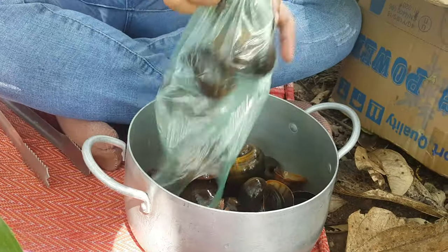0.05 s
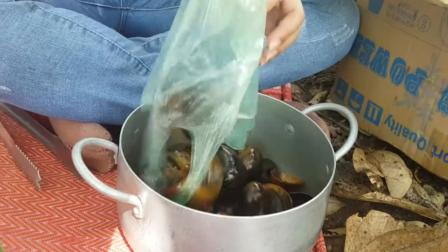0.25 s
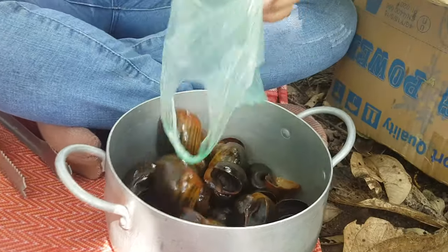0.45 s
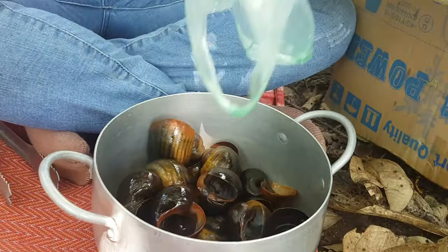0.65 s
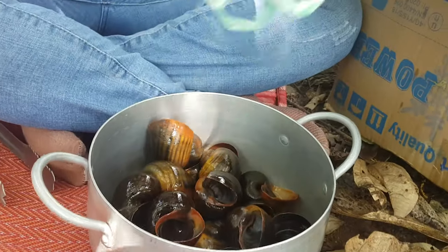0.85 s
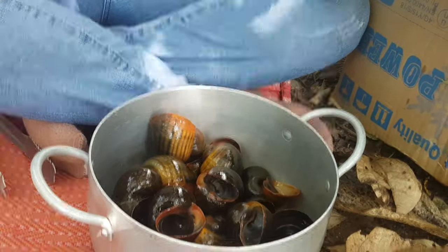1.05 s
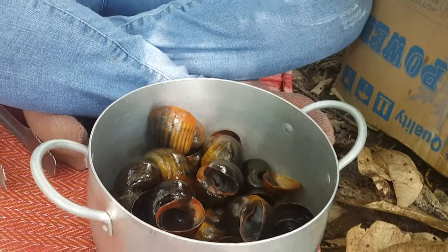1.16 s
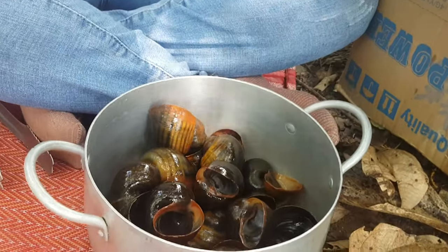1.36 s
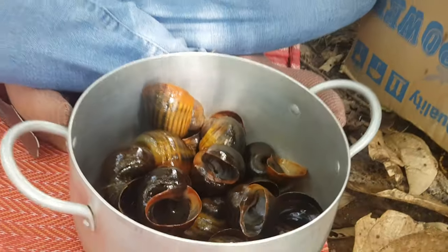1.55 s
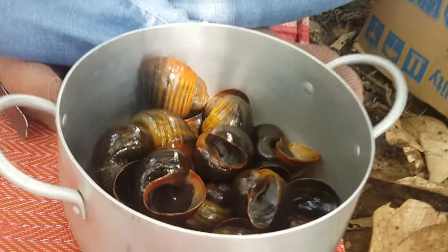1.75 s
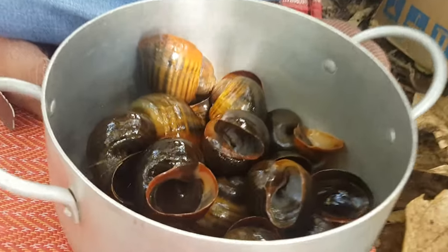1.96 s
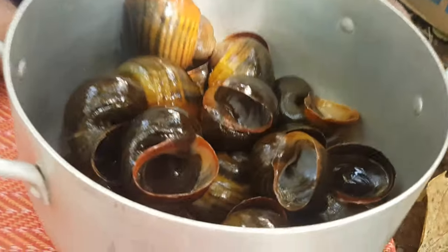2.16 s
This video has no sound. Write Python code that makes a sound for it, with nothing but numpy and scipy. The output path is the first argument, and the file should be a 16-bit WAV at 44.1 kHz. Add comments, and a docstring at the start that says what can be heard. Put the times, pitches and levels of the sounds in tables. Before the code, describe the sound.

Large hard snail shells spill from a rustling thin plastic bag into a metal pot, clattering densely for under half a second, then a few last knocks and dull taps on a mat; outdoors, close microphone.

```python
"""Snail shells into a metal pot

Large snail shells slide out of a thin plastic bag into a metal pot outdoors, heard close by.
Each knock chatters briefly: damped sines ring shell and pot over decaying noise for clack and crack.
Small chance clicks excite the pot modes as the pile shifts; random short-time spectra make the bag
rustle throughout. Later a few dull taps, short damped sines, land on the mat over a faint far rumble."""
import sys
import numpy as np
from scipy import signal
from scipy.fft import rfft, irfft
from scipy.io import wavfile
from scipy.ndimage import uniform_filter1d

SR = 44100
rng = np.random.default_rng(int(sys.argv[2]) if len(sys.argv) > 2 else 0)


def persist_wave(psi):
    """Save psi, clipped to +-1, as 16-bit WAV."""
    counts = np.round(np.clip(psi, -1, 1) * 32767).astype(np.int16)
    wavfile.write(sys.argv[1], SR, np.atleast_2d(counts).T)


N = 97020

# Far rumble: spectrum (frequency [Hz], level [dB]); course (time [s], level [dB])
RUMBLE_SPECTRUM = [(20, -26), (27, -22), (32, -37), (59, 1.5), (107, 5), (198, -14.5), (331, -7),
                   (400, -17), (520, -43), (880, -120)]
RUMBLE_COURSE = [(0.0, -59.5), (0.45, -56), (0.62, -66), (1.06, -64), (1.6, -52), (2.2, -57.5)]
# Bag: course before BAG_DB (time [s], level [dB]); film spectrum (frequency [Hz], level [dB])
BAG_COURSE = [(0, -52.5), (.03, -51.5), (.12, -40), (.2, -40.5), (.31, -34), (.42, -39.5), (.61, -52),
              (.8, -60), (.93, -58), (1.07, -50), (1.12, -55.5), (1.19, -50.5), (1.28, -55), (1.39, -47),
              (1.45, -49), (1.56, -47.5), (1.66, -49.5), (1.71, -53.5), (1.83, -49.5), (1.95, -56),
              (2.1, -51), (2.2, -54)]
BAG_SPECTRUM = [(88, -46), (150, -19), (175, -6.5), (566, -3.5), (649, -1), (1020, 0), (1170, -1),
                (1760, 1.5), (3100, 1.5), (4860, -1), (7470, 4.5), (9440, -2.5), (12900, 2.5), (15100, 2),
                (16000, -8.5)]
# Bag in stereo: (frequency [Hz], left-right likeness [0-1]); (frequency [Hz], left minus right [dB])
BAG_LIKENESS = [(60, 0.95), (180, 0.98), (550, 1), (1650, 1), (4970, 0), (15000, 0.0017)]
BAG_BALANCE = [(60, 4), (180, 3), (550, -1), (1650, -1), (4970, -5.0), (15000, -2.0)]
# Taps on the mat: (time before fixed delay [s], level [dB], pitch [Hz], thump [dB], T60 [s])
MAT_TAPS = [(0.954, -44, 627, -15, 0.02), (1.388, -48.5, 1230, -2, 0.018), (1.557, -14, 430, -29, 0.0059),
            (1.567, -23.5, 400, -10, 0.0051), (1.617, -9.5, 880, -14.5, 0.0062),
            (1.623, -18, 670, -13.5, 0.016), (1.63, -25.5, 338, -18.5, 0.035),
            (1.659, -27, 1380, -12, 0.009), (1.666, -28, 800, -18, 0.0071),
            (1.694, -24.5, 500, -13, 0.0065), (1.833, -38.5, 510, -6, 0.019), (2.117, -42, 720, -12, 0.016),
            (2.137, -33, 686, -10, 0.011)]
# Modes of the loaded pot and pile, before scatter: (frequency [Hz], level [dB], T60 [s])
POT_MODES = [(606, 1.5, 0.047), (870, 6, 0.012), (1038, -1, 0.068), (1402, 0, 0.021), (1640, 1, 0.0044),
             (2070, -10, 0.031), (2287, -10.5, 0.048), (4060, -21.5, 0.073), (4562, -17.5, 0.09),
             (5190, -15.5, 0.054), (6176, -18, 0.05)]
# Shells shifting in the pile, before PILE_DB: (time [s], level [dB])
PILE_COURSE = [(0.19, -37), (0.264, -64), (0.38, -24.5), (0.438, -22), (0.564, -28.5), (0.66, -39.5),
               (0.858, -38.5), (0.92, -85)]
# Shell knocks: (time before fixed delay [s], level [dB], hollow [Hz], wall [Hz],
#   hollow level before cap [dB], crack level [dB], chatter decay [s], crack centre [Hz])
SHELL_KNOCKS = [(0.075, -36, 1137, 3200, 10, 5.5, 0.0055, 3230),
                (0.097, -37, 1120, 3180, 6, -23, 0.0039, 6200),
                (0.209, -6, 535, 1640, 1, -8.5, 0.002, 8500),
                (0.214, -7.5, 780, 1580, -2, -11.5, 0.0091, 3550),
                (0.231, -10.5, 570, 1210, 6, -32, 0.0022, 3470),
                (0.235, -3.5, 555, 2130, -10, -5, 0.0021, 3660),
                (0.245, -6.5, 627, 1500, -22, -8.5, 0.0037, 3670),
                (0.263, -17, 520, 1020, -3, -15, 0.0023, 3970),
                (0.274, -10, 536, 2290, 7, -34.5, 0.0029, 3860),
                (0.299, -8.5, 1150, 3240, -14, -9, 0.0006, 3350),
                (0.314, -10.5, 640, 1300, -19, -10, 0.0013, 5800),
                (0.318, -1.5, 644, 2020, -3, -9.5, 0.0055, 3470),
                (0.336, -2, 1370, 1780, -18, -11, 0.0036, 8200),
                (0.346, -1.5, 680, 1210, -10.5, -15, 0.0023, 6660),
                (0.357, -7, 1136, 1960, -7, -12.5, 0.0071, 7550),
                (0.362, -7.5, 1060, 1500, -7, -14, 0.001, 3900),
                (0.3661, -13, 980, 3430, -21, 1.5, 0.0016, 3600),
                (0.375, -7.5, 580, 2000, 3, -12.5, 0.0039, 3520),
                (0.387, -12, 1000, 1830, -1.5, -15.5, 0.0064, 4740),
                (0.405, -10.5, 401, 3080, -27, 1, 0.0023, 12800),
                (0.406, -5.5, 600, 2340, -14, -8, 0.0015, 12300),
                (0.418, -3.5, 1040, 1870, -28, -14, 0.0042, 3950),
                (0.423, -6, 640, 2020, -26, -12.5, 0.0025, 4120),
                (0.4273, -5.5, 644, 1530, -2, -9.5, 0.0081, 3650),
                (0.438, -9.5, 1090, 1700, -15, -11, 0.01, 8200),
                (0.455, -7, 1020, 2220, -15, -13, 0.0058, 4400),
                (0.472, -8, 600, 2000, 1, -25, 0.0012, 3870),
                (0.482, -19.5, 1034, 1360, 10.5, -14, 0.014, 3740),
                (0.49, -9, 644, 1770, -10.5, -23, 0.0025, 6760),
                (0.503, -18, 554, 1700, 19, 1.5, 0.006, 8040),
                (0.512, -15, 990, 1340, 20.5, -7, 0.0085, 7150),
                (0.547, -12, 950, 2380, -5, -2.5, 0.0075, 4610),
                (0.566, -2, 806, 2000, -2, -21, 0.0032, 5440),
                (0.571, -9, 627, 2420, -3, -7.5, 0.0027, 5070),
                (0.578, -9, 816, 1460, -3, -12, 0.0011, 4600),
                (0.589, -18, 955, 1490, 2.5, -10, 0.0068, 4580),
                (0.609, -24, 614, 1940, -2, -7.5, 0.0053, 7550),
                (0.675, -28.5, 1000, 2030, 2, -12, 0.0028, 4600),
                (0.7114, -3.5, 620, 1800, -8, -19.5, 0.0018, 3500),
                (0.7326, -10.5, 600, 1060, -6, -12.5, 0.00056, 3500),
                (0.768, -28.5, 610, 2210, 4, -40, 0.0027, 4130),
                (0.778, -29.5, 1040, 1680, 13, -46, 0.0066, 3810),
                (0.797, -12, 1100, 1630, -10, -15, 0.002, 6600),
                (0.804, -16.5, 550, 1820, 2, -12, 0.0017, 3740),
                (0.813, -23.5, 1036, 2010, 4.5, -17, 0.007, 7850),
                (0.825, -27, 634, 1310, 12, -27, 0.0014, 4760),
                (0.841, -25.5, 1077, 575, 11, 0.5, 0.0023, 7850),
                (0.88, -31, 1080, 600, 9, -24, 0.0056, 7420),
                (0.99, -42.5, 1030, 1330, 3.5, -25, 0.0037, 7530)]
# Thump of the pot floor under each knock: (time [s], level [dB])
FLOOR_COURSE = [(.21, -2), (.216, -20), (.235, -11.5), (.26, -16.5), (.45, -21.5), (.57, -11.5), (.62, -21)]
# Bright crack and broad body of a blow: (frequency [Hz], level [dB])
CRACK_SPECTRUM = [(1470, -30), (2500, -1), (4170, -8.5), (5650, -5.5), (6200, -8.5), (6700, -2),
                  (10100, -11.5), (12400, -11.5), (15200, -15.5), (16000, -27)]
CLACK_SPECTRUM = [(88, -51), (150, -27), (596, 5.5), (749, -1), (1010, -2), (1230, -10), (1970, 1),
                  (2700, -6.5), (4500, -20.5), (9900, -120)]
# Stereo of the shells: (frequency [Hz], left minus right [dB])
SHELL_BALANCE = [(60, 6), (150, -0.5), (380, 3), (950, -1), (2380, -2), (5980, -7), (15000, 0.5)]
# Chance phase between the microphones: (frequency [Hz], phase scale [rad])
MIC_PHASE = [(800, 0.082), (1000, 0.16), (3000, 1)]

BAG_DB, CRINKLES_PER_S, CRINKLE_DB = 4.5, 1500, -3.5
THUMP_HZ, THUMP_T60_S = 205, 0.028
TAP_DELAY_S, TAP_RISE_S = 0.003, 0.0003
TAP_TICK_HZ, TAP_TICK_T60_S, TAP_TICK_DB = 1370, 0.003, -4
TAP_NOISE_DECAY_S, TAP_NOISE_DB = 0.0062, -18
POT_DB, POT_SCATTER_DB, POT_DETUNE = -18.5, 7, 0.0448  # detune as a fraction of frequency
STEADY_HZ = 1200  # modes up to here do not scatter
PILE_DB, SHIFTS_PER_S, SHIFT_SPREAD_DB, PILE_STRIKES = -4.5, 1400, 1, 12
KNOCK_DELAY_S, BLOW_RISE_S = 0.001, 0.0005  # start this much after the listed time, then rise
CHATTER_PER_S, CHATTER_DB = 1700, -7.5
REBOUND_MAX = 0.7  # no rebound outdoes the first blow
HOLLOW_T60_S, HOLLOW_REF_HZ = 0.021, 1000  # T60 at the reference pitch; lower hollows die sooner
HOLLOW_RISE_S = 0.0011
HOLLOW_MAX_DB = -5  # cap on knock level plus hollow level
WALL_DB, WALL_CYCLES = -1, 14.6  # cycles to fall 60 dB
TICK_HZ, TICK_T60_S, TICK_DB = 2970, 0.003, -6.5
CLACK_DB, CLACK_DECAY_S = -11, 0.0035
CRACK_DECAY_S, CRACK_OCTAVES, CRACK_BUMP_DB = 0.0018, 0.29, 10.5
BASS_CUT_HZ = 504
FLOOR_HZ, FLOOR_T60_S = 281, 0.015
ECHO_T60_S, ECHO_CUT_HZ, SHELL_ECHO_DB, TAP_ECHO_DB = 0.031, 1026, -3, -1
EDGE_HZ = 15800


def amp(db):
    """Decibels to amplitude ratio."""
    return 10 ** (np.asarray(db) / 20)


def evened(x):
    """Scale to unit RMS."""
    return x / np.sqrt(np.mean(x ** 2) + 1e-20)


def read(points, hz):
    """Interpolate a table over log frequency."""
    f, value = np.transpose(points)
    return np.interp(np.log(hz + 1), np.log(f + 1), value)


def level(course):
    """Amplitude over time, linear in dB; -120 dB before the first point."""
    s, db = np.transpose(course)
    return amp(np.interp(np.arange(N) / SR, s, db, left=-120, right=db[-1]))


def high_pass(x, hz, order=2):
    """Butterworth bass cut."""
    return signal.lfilter(*signal.butter(order, hz, "high", fs=SR), x)


def rise(t, rise_s):
    """Exponential approach to full level."""
    return 1 - np.exp(-t / rise_s)


def add(mix, s, sound):
    """Mix a sound in at a time, cut at the end."""
    part = mix[:, round(s * SR):][:, :sound.shape[1]]
    part += sound[:, :part.shape[1]]


def ring(hz, t60_s, t, phase=0):
    """Damped mode: a sine falling 60 dB in t60_s."""
    return amp(-60 * t / t60_s) * np.sin(2 * np.pi * hz * t + phase)


def pair(hz, t60_s, t, chance):
    """A ring heard at both microphones, out of step by chance."""
    phase = read(MIC_PHASE, hz) * chance
    return np.array([ring(hz, t60_s, t, phase), ring(hz, t60_s, t, -phase)])


def colour(x, points):
    """Filter by a spectrum table, leaving phase alone."""
    hz = np.fft.rfftfreq(x.shape[-1], 1 / SR)
    return irfft(rfft(x) * amp(read(points, hz)), x.shape[-1])


def lean(stereo, points):
    """Split a left-right level difference evenly over the channels."""
    left = colour(stereo[0], [(f, db / 2) for f, db in points])
    right = colour(stereo[1], [(f, -db / 2) for f, db in points])
    return np.array([left, right])


def hiss(points, size, patchy_db, flicker_db, same):
    """Random short-time spectra with drifting patches and a flicker shared by all bands."""
    hop = size // 4
    frames, hz = N // hop + 5, np.fft.rfftfreq(size, 1 / SR)
    a, b, c, d, patches = rng.standard_normal((frames, len(hz), 5)).T
    patches = uniform_filter1d(patches, size=12, axis=0)  # over frequency
    patches = evened(uniform_filter1d(patches, size=35, axis=1))  # over time
    flicker = evened(uniform_filter1d(rng.standard_normal(frames), size=5))
    like = np.clip(read(same, hz), -1, 1)[:, None]
    left = a + 1j * b
    right = like * left + np.sqrt(1 - like ** 2) * (c + 1j * d)
    gain_db = read(points, hz)[:, None] + patchy_db * patches + flicker_db * flicker
    spectra = np.array([left, right]) * amp(gain_db)
    return evened(signal.istft(spectra, nperseg=size, noverlap=size - hop)[1][:, :N])


def echoes(x):
    """Dense decaying reflections, drawn separately for each microphone."""
    count, spacing = 200, 20  # one reflection per 20 samples
    taps = np.zeros((2, count * spacing))
    at = np.arange(count) * spacing + rng.integers(0, spacing, (2, count))
    strength = rng.choice([-1., 1.], at.shape) * amp(-60 * at / SR / ECHO_T60_S)
    np.put_along_axis(taps, at, strength, 1)
    taps = high_pass(taps / np.linalg.norm(taps[0]), ECHO_CUT_HZ, order=4)
    return signal.fftconvolve(x, taps, axes=1)[:, :N]


def rumble():
    """Faint far rumble: low noise with a slow level course."""
    noise = hiss(RUMBLE_SPECTRUM, size=2048, patchy_db=-2.5, flicker_db=1, same=[(20, 1), (400, 0.72)])
    return level(RUMBLE_COURSE) * noise


def bag():
    """Soft hiss of thin film with tiny impulsive crinkles."""
    snaps = amp(np.minimum(rng.exponential(1, (2, N)), 3.5)) * rng.choice([-1, 1], (2, N))
    snaps *= rng.random(N) < CRINKLES_PER_S / SR
    film = hiss(BAG_SPECTRUM, size=256, patchy_db=2, flicker_db=1.5, same=BAG_LIKENESS)
    rustle = film + amp(CRINKLE_DB) * evened(colour(snaps, BAG_SPECTRUM))
    return amp(BAG_DB) * level(BAG_COURSE) * lean(rustle, BAG_BALANCE)


def tap(s, level_db, hz, thump_db, t60_s):
    """A short damped knock with a tick on top and a low thump under it."""
    t = np.arange(0, 0.1, 1 / SR)
    noise = np.exp(-t / TAP_NOISE_DECAY_S) * evened(colour(rng.standard_normal(len(t)), CLACK_SPECTRUM))
    tick = ring(TAP_TICK_HZ, TAP_TICK_T60_S, t) + amp(TAP_NOISE_DB) * noise
    thump = amp(thump_db) * ring(THUMP_HZ, THUMP_T60_S, t)
    sound = ring(hz, t60_s, t) + thump + amp(TAP_TICK_DB) * tick
    return s + TAP_DELAY_S, -amp(level_db) * rise(t, TAP_RISE_S) * sound[None]


def pot(t, scatter):
    """The pot's modes, struck at a chance place and the upper ones detuned by the shifting load."""
    hz, db, t60_s = np.transpose(POT_MODES)[:, :, None]
    size, detune, chance = scatter.T[:, :, None]
    upper = hz > STEADY_HZ
    gain = amp(db + POT_SCATTER_DB * size * upper)
    modes = pair(hz * (1 + POT_DETUNE * detune * upper), t60_s, t, chance)
    return (gain * modes).sum(1)


def pile():
    """Many small chance clicks among the tumbling shells, each ringing the pot modes."""
    t, out = np.arange(0, 0.08, 1 / SR), np.zeros((2, N))
    for scatter in rng.standard_normal((PILE_STRIKES, len(POT_MODES), 3)):
        clicks = amp(SHIFT_SPREAD_DB * rng.exponential(1, N))
        clicks *= rng.random(N) < SHIFTS_PER_S / PILE_STRIKES / SR
        out += signal.oaconvolve(clicks[None], pot(t, scatter), axes=1)[:, :N]
    active = np.arange(N) < PILE_COURSE[-1][0] * SR
    return amp(PILE_DB) * level(PILE_COURSE) * active * evened(out)


def chatter(t, decay_s):
    """A unit blow followed by sparse, fading random rebounds."""
    rebounds = np.clip(amp(CHATTER_DB) * rng.standard_normal(len(t)), -REBOUND_MAX, REBOUND_MAX)
    blows = np.exp(-t / decay_s) * rebounds * (rng.random(len(t)) < CHATTER_PER_S / SR)
    blows[0] = 1
    return blows


def smear(blows, decay_s, t):
    """Noise envelope, peak 1: every blow starts an exponential decay."""
    envelope = signal.fftconvolve(abs(blows), np.exp(-t / decay_s))[:len(t)]
    return envelope / envelope.max()


def knock(s, level_db, hollow_hz, wall_hz, hollow_db, crack_db, chatter_s, crack_hz):
    """A blow and its quick rebounds ring shell and pot over a rough clack and a bright crack."""
    t = np.arange(0, 0.1, 1 / SR)
    blows = chatter(t, chatter_s)
    hollow_chance, wall_chance = rng.choice([-1, 1], 2)

    hollow_t60_s = HOLLOW_T60_S * hollow_hz / HOLLOW_REF_HZ
    hollow = rise(t, HOLLOW_RISE_S) * pair(hollow_hz, hollow_t60_s, t, hollow_chance)
    hollow *= amp(min(hollow_db, HOLLOW_MAX_DB - level_db))

    wall = amp(WALL_DB) * pair(wall_hz, WALL_CYCLES / wall_hz, t, wall_chance)
    tick = amp(TICK_DB) * ring(TICK_HZ, TICK_T60_S, t)
    body = wall + tick + amp(POT_DB) * pot(t, rng.standard_normal((len(POT_MODES), 3)))

    width = 2 ** CRACK_OCTAVES
    bump = [(crack_hz / width, 0), (crack_hz, CRACK_BUMP_DB), (crack_hz * width, 0)]
    crack_noise = colour(colour(rng.standard_normal((2, len(t))), CRACK_SPECTRUM), bump)
    crack = evened(crack_noise) * smear(blows, CRACK_DECAY_S, t)
    clack_noise = colour(rng.standard_normal(len(t)), CLACK_SPECTRUM)
    clack = evened(clack_noise) * smear(blows, CLACK_DECAY_S, t)

    rung = signal.fftconvolve(blows[None], body)[:, :len(t)]
    rung *= np.linalg.norm(body) / np.linalg.norm(rung)  # rebounds leave the energy unchanged
    struck = (rung + amp(CLACK_DB) * clack) * rise(t, BLOW_RISE_S) + hollow
    struck = high_pass(struck, BASS_CUT_HZ)
    floor_db = np.interp(s, *np.transpose(FLOOR_COURSE))
    floor = amp(floor_db) * rise(t, HOLLOW_RISE_S) * ring(FLOOR_HZ, FLOOR_T60_S, t)
    return s + KNOCK_DELAY_S, amp(level_db) * (struck + floor + amp(crack_db) * crack)


def scene():
    """Rumble, bag, taps and shells; taps and shells with echoes."""
    shells, taps = np.zeros((2, N)), np.zeros((2, N))
    for row in SHELL_KNOCKS:
        add(shells, *knock(*row))
    for row in MAT_TAPS:
        add(taps, *tap(*row))
    shells = high_pass(shells + pile(), 130)
    taps = high_pass(taps, 110)
    background = rumble()
    shells = lean(shells + amp(SHELL_ECHO_DB) * echoes(shells), SHELL_BALANCE)
    taps = taps + amp(TAP_ECHO_DB) * echoes(taps)
    return shells + taps + bag() + background


def record(dry):
    """Soft overload, then a low-pass band limit."""
    soft = 1.1 * np.tanh(dry / 1.1)
    band_limit = signal.firwin(511, EDGE_HZ, window=("kaiser", 9), fs=SR)
    return signal.oaconvolve(soft, band_limit[None], "same")


dry = scene()
out = record(dry)
persist_wave(out)
```